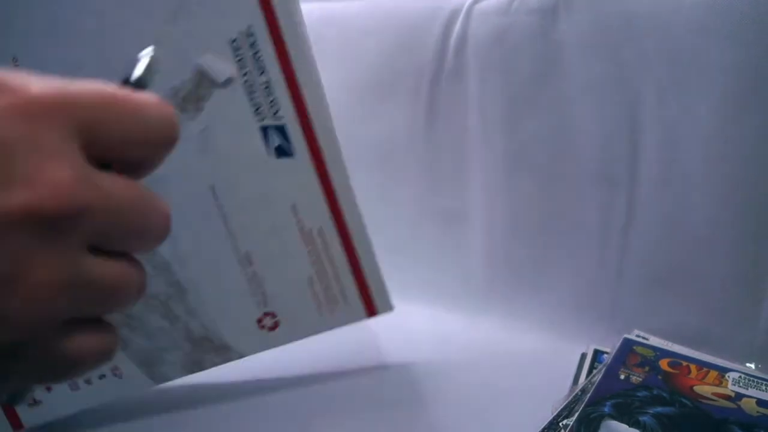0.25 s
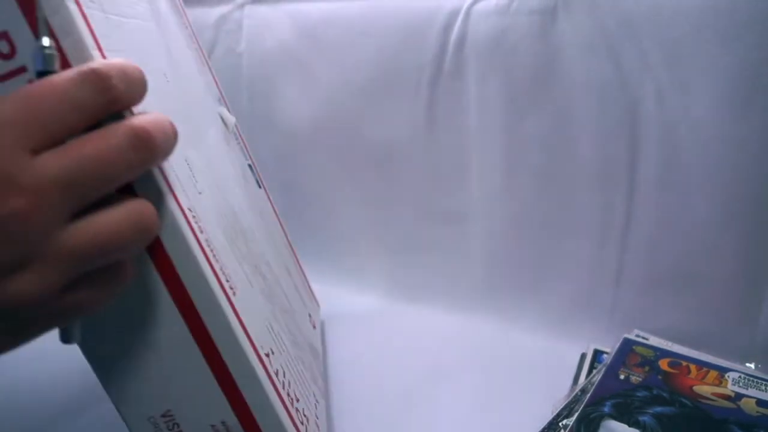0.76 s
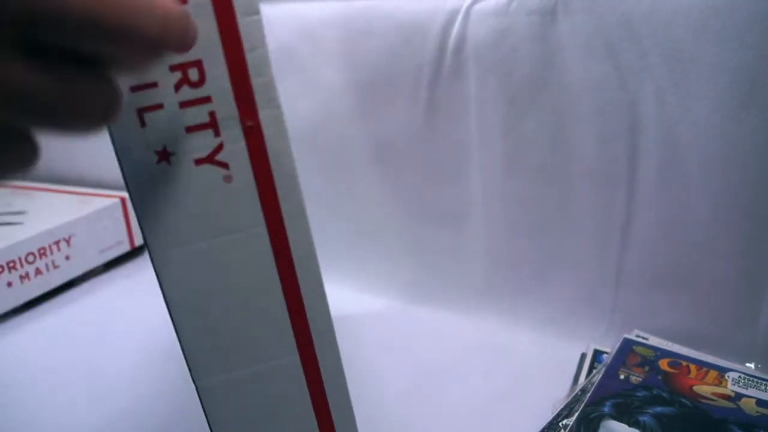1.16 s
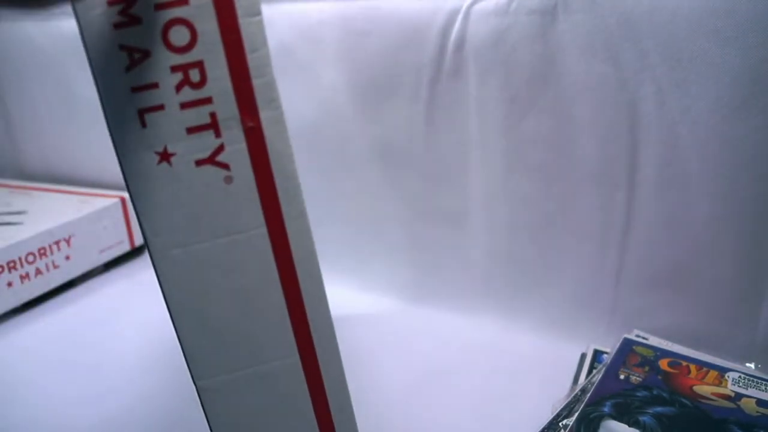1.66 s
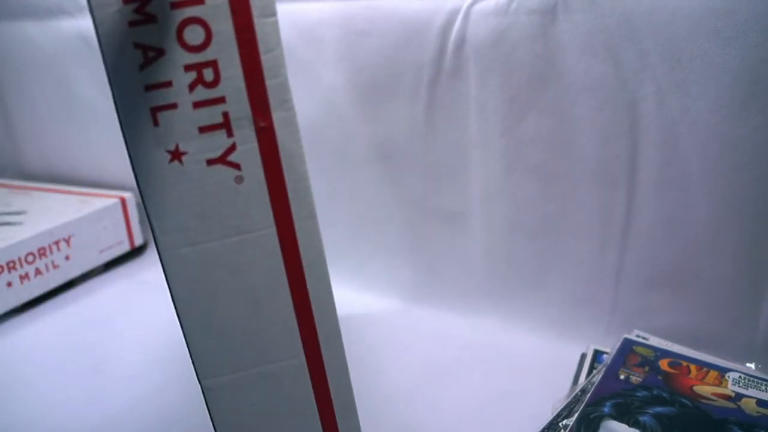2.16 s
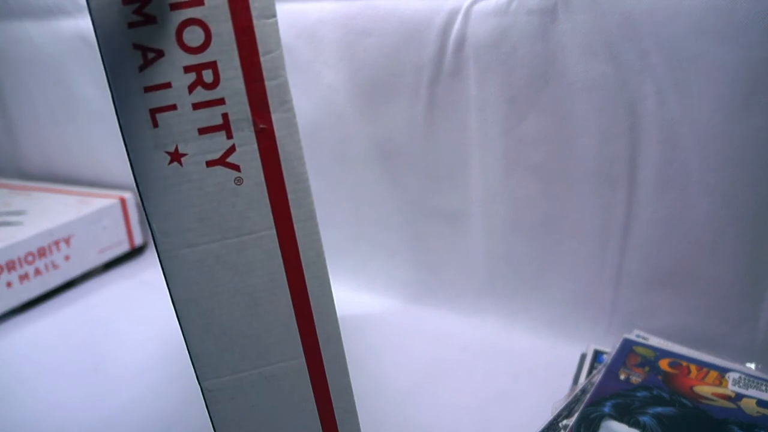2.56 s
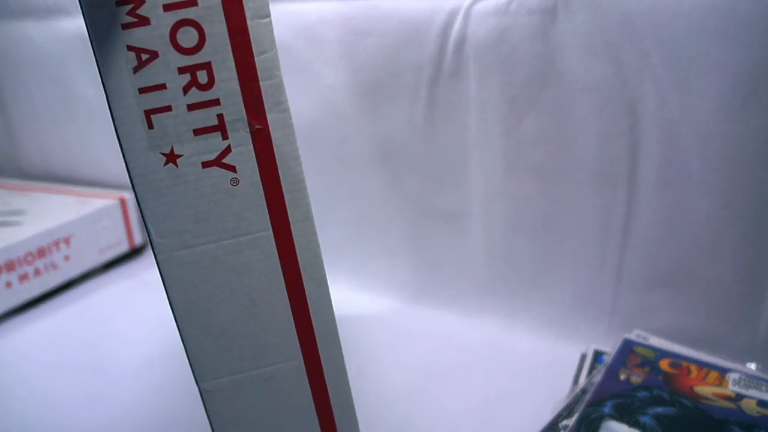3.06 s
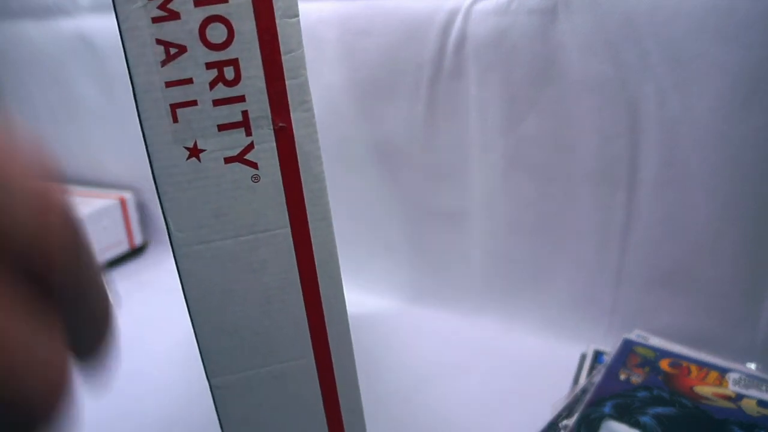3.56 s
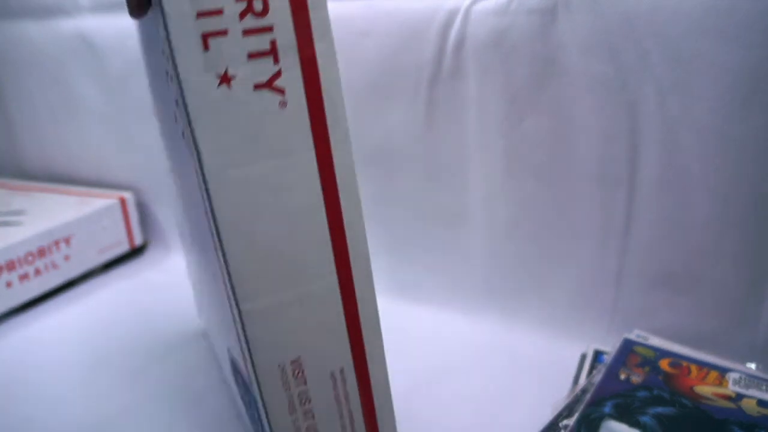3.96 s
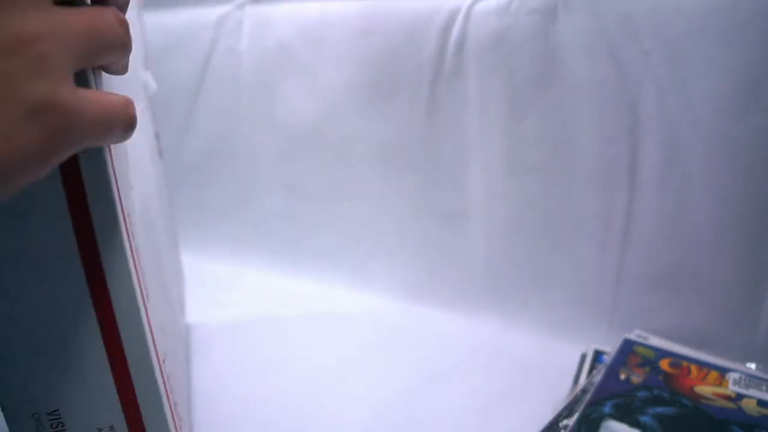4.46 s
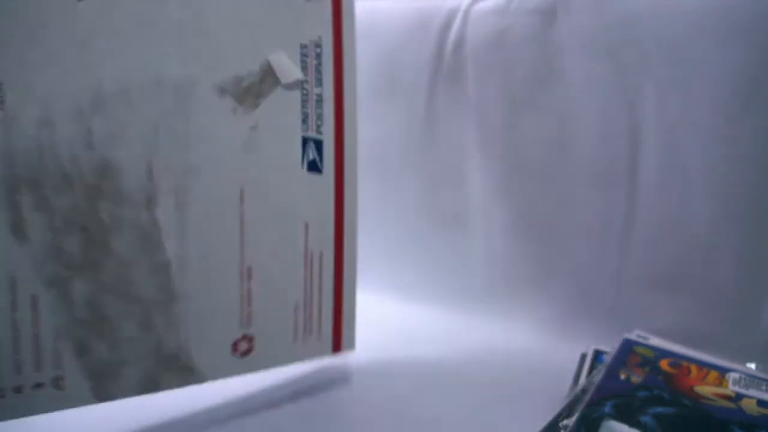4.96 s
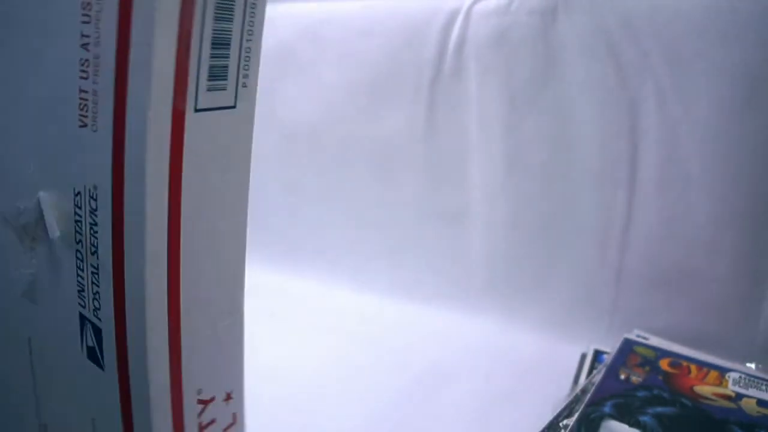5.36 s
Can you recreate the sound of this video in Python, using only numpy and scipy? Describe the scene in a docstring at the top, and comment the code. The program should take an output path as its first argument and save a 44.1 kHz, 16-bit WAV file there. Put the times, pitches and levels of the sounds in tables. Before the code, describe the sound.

A cardboard box is turned and dragged with hollow thumps, then a blade picks at its taped seam in irregular snapping bursts, close up indoors.

```python
"""Short bright snaps and hollow booms: a blade picks at the taped seam of a flat cardboard box.
The box is turned and dragged on a cloth-covered table, heard close up in a small quiet room.
Contacts are shaped noise bursts that ring box modes; dragging is coloured noise that follows level curves.
Loose tape crinkles in dry ticks, the blade twangs as dying tones, and faint room tone lies beneath."""
import sys
import numpy as np
from scipy import signal
from scipy.fft import rfft, irfft, next_fast_len
from scipy.io import wavfile
from scipy.ndimage import uniform_filter1d, map_coordinates

SR = 44100
rng = np.random.default_rng(int(sys.argv[2]) if len(sys.argv) > 2 else 0)


def wav_record(signal):
    """Record a signal, one row per channel, as 16-bit PCM in the file named by sys.argv[1]."""
    frames = np.transpose(np.atleast_2d(signal))
    bounded = np.clip(frames, -1, 1)
    # unit amplitude maps onto the largest positive 16-bit level
    quanta = np.round(bounded * 32767).astype(np.int16)
    wavfile.write(sys.argv[1], SR, quanta)


N = 247621


def amp(db):
    """Amplitude factor of a level in dB."""
    return 10 ** (np.asarray(db) / 20)


def unit(x):
    """x scaled to RMS 1."""
    return x / np.sqrt(np.mean(x ** 2) + 1e-20)


def along(points, hz):
    """Curve through (Hz, value) points, read on a log frequency axis."""
    point_hz, value = np.transpose(points)
    return np.interp(np.log(hz + 1), np.log(point_hz + 1), value)


def wobble(rate_hz):
    """A smooth random curve, rate_hz knots a second."""
    knots = rng.standard_normal(int(N * rate_hz / SR) + 4)
    return map_coordinates(knots, [np.arange(N) * rate_hz / SR])


def filtered(x, response):
    """x times a response of frequency."""
    size = next_fast_len(x.shape[-1] + 8192)
    spectrum = rfft(x, size) * response(np.fft.rfftfreq(size, 1 / SR))
    return irfft(spectrum, size)[..., :x.shape[-1]]


def causal(colour, size=2048):
    """Minimum-phase impulse response of energy 1 with this colour, by folding the cepstrum."""
    magnitude = amp(along(colour, np.fft.rfftfreq(size, 1 / SR)))
    cepstrum = irfft(np.log(magnitude + 1e-4))
    cepstrum[1:size // 2] *= 2
    cepstrum[size // 2 + 1:] = 0
    impulse = irfft(np.exp(rfft(cepstrum)))
    return impulse / np.linalg.norm(impulse)


def patchy_noise(colour, grain_db, patchy_db):
    """Coloured stereo noise of RMS 1, uneven in fine grains and in patches of pitch and time."""
    # Left-right likeness. Each row: frequency in Hz, correlation from 0 to 1.
    likeness = [(60, 0.99), (250, 0.79), (1000, 0.58), (4000, 0.87), (9000, 0.85)]
    grain = amp(grain_db * wobble(700))
    z = signal.stft(grain * rng.standard_normal((2, N)), nperseg=256)[2]
    field = uniform_filter1d(rng.standard_normal(z.shape[1:]), 6, 0)
    field = uniform_filter1d(field, 10, 1)
    pair = signal.istft(z * amp(patchy_db * unit(field)), nperseg=256)[1][:, :N]

    def mid_side(hz):
        angle = np.arccos(np.clip(along(likeness, hz), -1, 1)) / 2
        return amp(along(colour, hz)) * [np.cos(angle), np.sin(angle)]

    mid, side = filtered(pair, mid_side)
    return unit(np.array([mid + side, mid - side]))


def room_tone():
    """Steady faint noise of the quiet room."""
    # Each row: frequency in Hz, relative level in dB.
    air_colour = [(15, -30), (45, -1.5), (142, 10), (385, -2), (1280, -9.5), (1690, -25), (5340, -42),
                  (7640, -33), (11200, -28), (14600, -57), (22000, -120)]
    return amp(-61) * patchy_noise(air_colour, grain_db=0.5, patchy_db=1.2)


def rubbing():
    """Dragging card hisses, rasps and shakes the hollow box; fibres catch and the drag jerks a little."""
    # Noise colours. Each row: frequency in Hz, relative level in dB.
    hiss_colour = [(2350, -3.5), (4000, -2.5), (5360, -3), (7540, 6.5), (9470, -2), (11200, -9.5),
                   (14600, -57), (22000, -120)]
    rasp_colour = [(530, -28), (900, -9), (1830, -5), (4800, -10.5), (6240, -11.5), (10600, -120)]
    rumble_colour = [(18, -74), (30, -42), (91, -27), (112, -22.5), (182, -5.5), (1000, -10), (1300, -91),
                     (2200, -120)]
    # One list a stretch of handling. Each row: time in seconds, hiss level in dB, rasp level in dB.
    drags = [
        [(0, -43, -53.5), (0.085, -37.5, -41.5), (0.13, -39, -48), (0.21, -36, -54.5), (0.27, -41, -50.5),
         (0.41, -47, -52.5)],
        [(0.47, -43, -53), (0.535, -34.5, -86), (0.57, -35.5, -43), (0.65, -44, -45), (0.72, -37, -38.5),
         (0.83, -43.5, -56.5), (0.865, -27.5, -35), (0.96, -40.5, -43), (1.01, -38, -55.5), (1.1, -53, -52.5),
         (1.2, -45, -85), (1.3, -54, -57.5), (1.42, -58.5, -54)],
        [(1.5, -60, -63), (1.95, -63, -66), (2.3, -61.5, -62.5), (2.45, -57.5, -53.5), (3.04, -57.5, -59),
         (3.3, -54, -46.5), (3.5, -56, -52.5), (3.6, -55, -58.5)],
        [(3.74, -51, -54), (3.83, -46.5, -45.5), (3.88, -36.5, -43), (3.93, -37, -48), (3.98, -48.5, -55),
         (4.1, -56, -55.5), (4.3, -54.5, -58)],
        [(4.375, -51, -59), (4.48, -35.5, -41.5), (4.55, -41, -41), (4.6, -33.5, -51), (4.68, -46, -47),
         (4.81, -30.5, -43.5), (4.85, -35.5, -39), (4.91, -33, -36), (4.95, -40, -39.5), (5.03, -35.5, -43),
         (5.17, -40, -51), (5.24, -43.5, -45.5)],
        [(5.269, -32.5, -36), (5.31, -41.5, -44), (5.37, -41.5, -41), (5.41, -33.5, -35), (5.445, -38.5, -41),
         (5.48, -33, -35), (5.52, -43.5, -44), (5.545, -18, -29), (5.615, -51, -35)],
    ]
    rumble_mean_db, rumble_per_rasp = -56, 0.88  # dB before jerk; dB swing per dB of rasp swing
    time_s, *levels = np.concatenate(drags).T
    hiss_db, rasp_db = (np.interp(np.arange(N) / SR, time_s, db) for db in levels)
    rumble_db = rumble_mean_db + rumble_per_rasp * (rasp_db - rasp_db.mean())
    jerk = wobble(30)
    hiss = amp(hiss_db + 0.43 * jerk) * patchy_noise(hiss_colour, grain_db=1.0, patchy_db=2.0)
    rasp = amp(rasp_db + 1.0 * jerk) * patchy_noise(rasp_colour, grain_db=1.0, patchy_db=3.5)
    rumble = amp(rumble_db + 0.6 * jerk) * patchy_noise(rumble_colour, grain_db=3, patchy_db=2.2)
    return hiss + rasp + rumble


def room(x):
    """One sound and its answer from the walls; each frequency dies at its own speed."""
    # Reverberation. Each row: frequency in Hz, T60 in seconds.
    decay = [(150, 0.21), (500, 0.29), (1500, 0.31), (6000, 0.24), (11000, 0.15)]
    delay_samples, wet_db = 130, -6.5
    hz, t, z = signal.stft(rng.standard_normal((2, SR // 3)), SR, nperseg=256)
    fade = amp(-60 * t / along(decay, hz)[:, None])
    common, apart = signal.istft(z * fade, SR, nperseg=256)[1]
    # close ports differ mostly in the treble
    tail = common + 0.5 * np.diff(apart, prepend=0) * np.array([[1], [-1]])
    tail = amp(wet_db) * tail / np.linalg.norm(tail[0])
    wet = signal.fftconvolve(np.pad(x, (delay_samples, 0))[None], tail, axes=1)
    return wet + np.pad(x, (0, wet.shape[1] - len(x)))


def box_boom(t, boom_db, boom_hz, boom_t60_s, burst_t60_s, focus):
    """Panel and cavity modes ring, strongest near boom_hz; a higher focus keeps to fewer modes."""
    # Each row: mode frequency in Hz, relative level in dB.
    box_modes = [(160, -65), (205, -5.5), (265, -1), (325, -2.5), (375, 0.5), (432, 2.5), (525, 2.5),
                 (600, -1), (655, -3), (740, -6), (860, 0.5), (1035, -56)]
    hz, mode_db = (column[:, None] for column in np.transpose(box_modes))
    # a blow reaches modes below its centre more easily than above
    focus_db = focus * np.where(hz > boom_hz, 17, 9)  # dB per squared octave
    scatter_db = rng.normal(0, 1.57, hz.shape)
    weight = amp(mode_db - focus_db * np.log2(hz / boom_hz) ** 2 + scatter_db)
    # each hit shifts the modes a little at random, which blurs the box's pitch
    detune = 1 + rng.normal(0, 0.071, hz.shape)
    mode_t60_s = max(boom_t60_s, 0.01) * np.sqrt(boom_hz / hz)  # higher modes die sooner
    t = np.maximum(t - 0.00307, 0)  # the panels answer a little after the crack
    ring = weight * amp(-60 * t / mode_t60_s) * np.sin(2 * np.pi * hz * detune * t)
    attack = 1 - np.exp(-t / (0.062 * burst_t60_s))
    return amp(boom_db) * np.sqrt(2) * ring.sum(0) * attack / np.linalg.norm(weight)


def contact(crack_db, click_db, clack_db, boom_db, boom_hz, burst_t60_s, boom_t60_s, focus=1):
    """A ragged burst of tiny slips in three colours, with the box modes it rings."""
    # Burst colours. Each row: frequency in Hz, relative level in dB.
    crack_colour = [(2820, -71), (4800, -13), (8000, -2.5), (10500, -15), (11200, -15.5), (14600, -49),
                    (22000, -120)]
    click_colour = [(1500, -16), (2300, -2.5), (4800, -2.5), (7000, -30)]
    clack_colour = [(600, -7), (1100, 7.5), (1700, 4.5), (2300, -3.5), (3500, -40)]
    t = np.arange(SR // 4) / SR
    burst_t60_s = max(burst_t60_s, 0.003)
    # longer contacts start softer
    shape = amp(-60 * t / burst_t60_s) * (1 - np.exp(-t / (0.07 * burst_t60_s)))
    # slips come about a millisecond apart
    slips = amp(4 * unit(uniform_filter1d(rng.standard_normal(len(t)), 30)))
    bursts = rng.standard_normal((3, len(t))) * slips * shape
    bursts *= np.linalg.norm(shape) / np.linalg.norm(bursts, axis=1, keepdims=True) / shape.max()
    gains = amp([crack_db, click_db, clack_db])
    sound = box_boom(t, boom_db, boom_hz, boom_t60_s, burst_t60_s, focus)
    for gain, burst, colour in zip(gains, bursts, (crack_colour, click_colour, clack_colour)):
        sound += gain * signal.fftconvolve(burst, causal(colour))[:len(t)]
    return sound


def twang(ring_db, hz, t60_s):
    """Steel in a loose grip: a dying tone whose phase wanders, more so at high pitch."""
    t = np.arange(SR // 4) / SR
    wander = np.sqrt(hz / 1.5e5) * np.cumsum(rng.standard_normal(len(t)))
    attack = 1 - np.exp(-t / 0.00058)
    return amp(ring_db - 60 * t / t60_s) * np.sin(2 * np.pi * hz * t + wander) * attack


def crinkle(click_db, boom_db):
    """Loose tape and flaps under the fingers: a dry tick of middle pitch."""
    return contact(click_db - 1, click_db, click_db - 3, boom_db,
                   boom_hz=544, burst_t60_s=0.023, boom_t60_s=0.045)


def knock(boom_db, boom_hz, boom_t60_s, clack_db):
    """A blunt contact: mostly the box itself, in the modes near the centre of the blow."""
    return contact(clack_db - 2, clack_db - 7, clack_db, boom_db, boom_hz,
                   burst_t60_s=0.017, boom_t60_s=boom_t60_s, focus=2.7)


def snap(crack_db, boom_db, burst_t60_s):
    """A bright contact on the taped seam; the thin blade spreads over many modes."""
    boom_share = 0.26  # the clack follows the boom (1) or the crack (0)
    clack_db = crack_db - 11 + boom_share * (boom_db - crack_db)
    return contact(crack_db, crack_db - 9, clack_db, boom_db,
                   boom_hz=486, burst_t60_s=burst_t60_s, boom_t60_s=0.05, focus=0.072)


def contacts():
    """All contacts and twangs in the room; each gets a freshly drawn echo tail."""
    # The blade slips free. Each row: start in seconds, ring level in dB, pitch in Hz, T60 in seconds.
    twangs = [(1.925, -47, 2130, 0.043), (1.993, -36, 2185, 0.077), (2.157, -19, 6130, 0.03),
              (2.160, -25.5, 6980, 0.049), (2.806, -40, 2156, 0.15), (3.152, -37.5, 2140, 0.14)]
    # Tape and flaps. Each row: start in seconds, click level in dB, boom level in dB.
    crinkles = [(5.138, -37, -55), (5.145, -33, -41), (5.568, -31, -33), (5.588, -21.5, -25),
                (5.593, -28, -21.5), (5.607, -24, -30)]
    # Edges, fingers and blade on the box. Each row: start in seconds, boom level in dB,
    # boom centre in Hz, boom T60 at that centre in seconds, clack level in dB.
    knocks = [(0.225, -31.5, 450, 0.095, -35.5), (0.55, -33, 448, 0.071, -50), (0.572, -32, 600, 0.14, -37),
              (0.586, -19.5, 190, 0.071, -39), (0.613, -9, 337, 0.042, -22.5),
              (0.869, -11.5, 384, 0.06, -20.5), (1.052, -42.5, 482, 0.07, -47.5),
              (1.46, -41.5, 397, 0.045, -45), (1.757, -48, 400, 0.04, -66), (1.888, -49, 450, 0.045, -70),
              (1.992, -34.5, 218, 0.15, -36.5), (2.424, -31, 420, 0.027, -66),
              (3.991, -19.5, 240, 0.05, -53), (4.005, -20, 277, 0.09, -56), (4.059, -29.5, 216, 0.062, -60),
              (4.15, -43, 442, 0.03, -55), (4.598, -34.5, 440, 0.07, -31.5), (4.86, -12, 255, 0.11, -21),
              (4.885, -18, 322, 0.023, -28), (5.193, -22.5, 493, 0.038, -30.5),
              (5.535, -18, 382, 0.05, -28)]
    # Blade through tape and card. Each row: start in seconds, crack level in dB, boom level in dB,
    # burst T60 in seconds.
    snaps = [(0.137, -40, -31, 0.062), (0.153, -29, -41, 0.015), (0.1728, -14, -26.5, 0.0078),
             (0.943, -24, -30.5, 0.015), (2.005, -38.5, -32, 0.031), (2.158, -26.5, -31.5, 0.015),
             (2.238, -47.5, -40, 0.024), (2.494, -20.5, -19, 0.019), (2.543, -41.5, -22.5, 0.11),
             (2.604, -33, -23, 0.041), (2.655, -28, -28, 0.011), (2.739, -45.5, -41, 0.022),
             (2.784, -30, -19.5, 0.021), (2.802, -36, -33, 0.046), (2.943, -47, -39, 0.033),
             (3.04, -61, -35, 0.055), (3.062, -34, -23.5, 0.047), (3.135, -26, -17, 0.029),
             (3.153, -41, -26.5, 0.12), (3.195, -33.5, -22, 0.029), (3.23, -32.5, -24, 0.032),
             (3.281, -29.5, -20, 0.029), (3.327, -30.5, -24, 0.031), (3.364, -24.5, -16.5, 0.029),
             (3.385, -26.5, -17, 0.041), (3.41, -27.5, -21.5, 0.028), (3.435, -29, -40, 0.021),
             (3.863, -17, -22.5, 0.013), (3.899, -29.5, -33, 0.029), (4.388, -39.5, -72, 0.079)]
    out = np.zeros((2, N + SR))
    for make, table in ((twang, twangs), (crinkle, crinkles), (knock, knocks), (snap, snaps)):
        for start_s, *controls in table:
            heard = room(make(*controls))
            start = round(start_s * SR)
            out[:, start:][:, :heard.shape[1]] += heard
    return out[:, :N]


def scene():
    """Room tone, dragging and contacts together."""
    return room_tone() + rubbing() + contacts()


def record(dry):
    """Two microphone ports of slightly different colour lose deep bass and all above the band limit."""
    # Port difference. Each row: frequency in Hz, left over right in dB.
    port_lean = [(250, 0.35), (1000, 2), (4000, 1.25), (9000, 1.3)]
    bass_hz, top_hz = 90, 11150

    def response(hz):
        ports = amp(along(port_lean, hz) * np.array([[0.5], [-0.5]]))
        bass_cut = (1j * hz / (1j * hz + bass_hz)) ** 2
        return ports * bass_cut / (1 + (hz / top_hz) ** 120)

    return filtered(dry, response)


dry = scene()
out = record(dry)
wav_record(out)
```